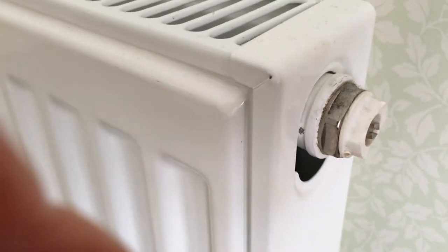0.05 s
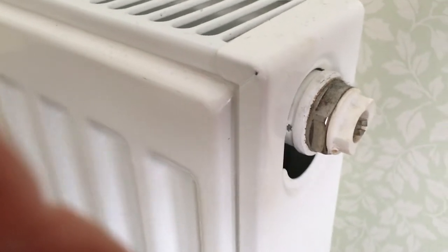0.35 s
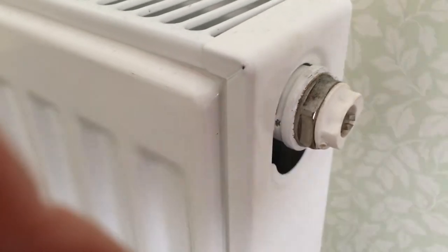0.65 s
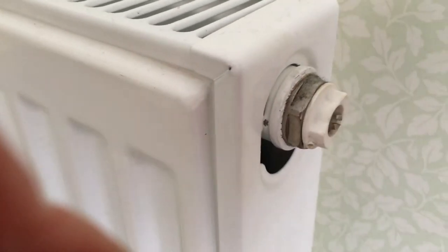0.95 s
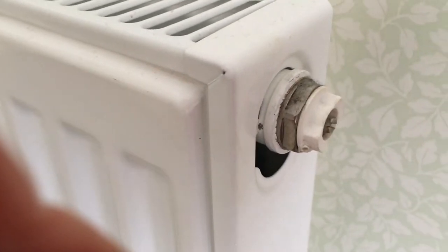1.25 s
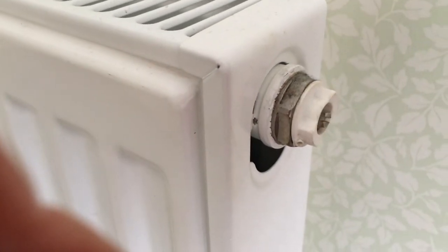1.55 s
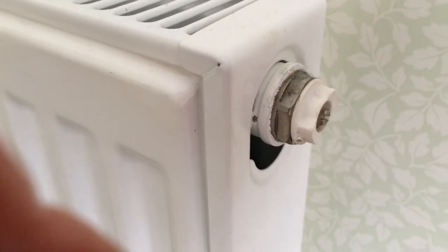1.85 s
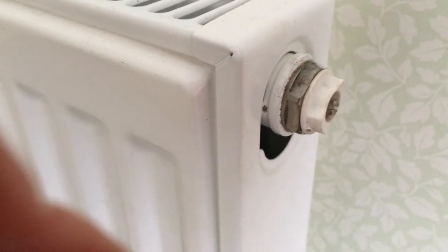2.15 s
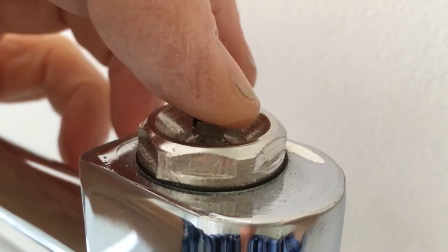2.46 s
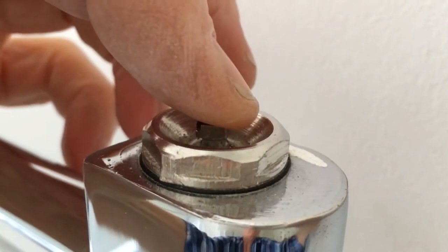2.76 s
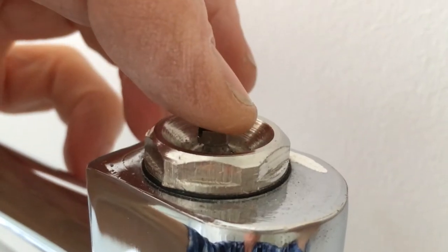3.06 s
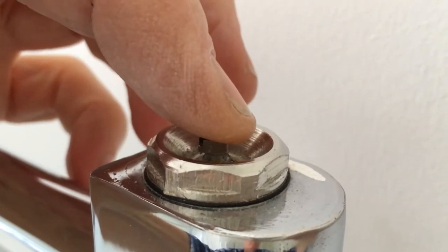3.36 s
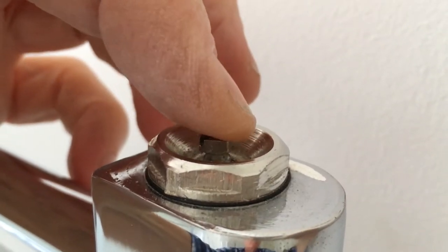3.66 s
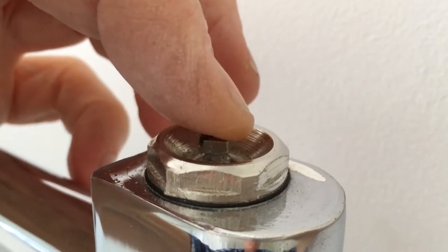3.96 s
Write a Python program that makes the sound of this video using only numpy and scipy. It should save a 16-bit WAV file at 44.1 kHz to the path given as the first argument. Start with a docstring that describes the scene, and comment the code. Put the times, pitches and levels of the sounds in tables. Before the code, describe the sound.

A close, steady hiss of air escapes a radiator valve indoors. Soft handling knocks come about halfway, then a second valve spits and hisses more brightly, giving faint metallic pings as fingers open it and ease it back.

```python
"""Air hisses from the bleed valves of two radiators in turn, close to a hand-held camera in a quiet room.
Each hiss is turbulent noise shaped by the valve's resonances: the first is steady, and at 2.2 s a short
spit leads to the second, thinner and brighter. Fingers turn that valve, and its metal modes ping as it
opens and as it is eased back. The hand bumps and clicks on the camera and rustles as it grips the valve;
beneath lies low room tone, with one brief hum."""
import sys
import numpy as np
from scipy import signal
from scipy.fft import rfft, irfft, next_fast_len
from scipy.io import wavfile
from scipy.ndimage import uniform_filter1d, map_coordinates

SR = 44100
rng = np.random.default_rng(int(sys.argv[2]) if len(sys.argv) > 2 else 0)


def log_audio(samples):
    """Write samples as a 16-bit WAV file to the path given in sys.argv[1]."""
    # one column per channel
    frames = np.atleast_2d(samples).T
    # limit to full scale, then quantise
    limited = np.clip(frames, -1, 1)
    pcm = np.round(limited * 32767).astype(np.int16)
    wavfile.write(sys.argv[1], SR, pcm)


N = 176400

# Relative spectra of the air jets: frequency_hz, density_db
FIRST_JET = [(100, -80), (400, -41), (820, -24.5), (950, -19.0), (1420, -18), (1640, -11), (1770, -12.5),
             (2110, -5), (2580, -9), (2710, -13.5), (3100, -11.5), (3570, -17.0), (3700, -11), (4010, -8),
             (4090, -8.5), (4740, 0), (4870, -3.5), (5170, 0), (5470, -1.5), (5810, -7), (6500, -8.5),
             (7020, -2.5), (7450, -6.5), (7880, -5.5), (8700, -6.5), (9040, -10), (9520, -6.5),
             (10030, -7.5), (10470, -18), (10770, -7), (11110, -17), (11240, -10), (11580, -6),
             (11670, -6.5), (12360, 0.5), (12920, -3.0), (13390, -14), (13610, -9), (13780, -8.5),
             (14170, -4), (14940, -9.5), (15120, -15.5)]
SPIT_JET = [(880, -56), (1500, -25), (3270, -22.5), (4810, -24), (5350, -12), (8410, 2), (12100, -11),
            (15000, -3.5)]
OPEN_JET = [(187, -82), (750, -43), (1510, -28), (2020, -22.5), (2370, -18), (2670, -19), (3140, -11.5),
            (3490, -15), (3620, -20), (3790, -21.5), (3880, -20), (4050, -13), (4350, -12), (4440, -15.5),
            (4610, -13.5), (4780, -14.5), (5080, -11.0), (5810, -5), (6070, -8.5), (7240, -10.5),
            (7360, -7), (7490, -9.5), (8660, 1), (9130, 0.0), (9430, -8), (9780, -2), (10290, -3.5),
            (10420, -7.5), (11370, -4.5), (11710, -7.5), (12060, -13), (12320, -13), (12920, -2),
            (13350, -10.0), (13910, -2), (14380, 0), (14940, -5.5), (15120, -13.5)]
THROTTLED_JET = [(237, -80), (950, -42), (1950, -20.5), (2530, -18), (3220, -12), (3790, -20.5),
                 (4250, -10.5), (4590, -14.5), (5860, -6), (6200, -13), (7460, -9.5), (8730, 1.5),
                 (9070, 2), (9420, -10), (9760, -2), (10450, -7), (11480, -4.5), (12060, -9.0), (12980, -2),
                 (13440, -5), (13780, 1), (15040, -5.5)]
# Relative spectra of the room tone at each radiator: frequency_hz, density_db
FIRST_ROOM = [(15, -32), (25, -2.5), (49, 0.5), (160, -10), (204, -8.5), (325, -11), (413, -16),
              (472, -13.5), (900, -21), (1170, -28), (1980, -120)]
SECOND_ROOM = [(15, -67), (25, -26), (50, -7), (86, 1), (125, -11.5), (167, -4), (329, -16), (400, -15.5),
               (496, -20.5), (1800, -27), (2340, -60), (3960, -120)]
# Partials of the hum: pitch_hz, width_hz, relative_db
HUM_PARTIALS = [(138.2, 16, -0.5), (224, 9.5, 2), (294, 60, -10)]
# Soft impacts of the hand on the camera: start_s, level_db
HAND_BUMPS = [(1.429, -49), (1.485, -43), (1.941, -40), (2.012, -48), (2.052, -39), (2.12, -39)]
# Sharp impacts on the camera: start_s, level_db, cutoff_hz
HAND_CLICKS = [(1.9353, -37, 1400), (2.047, -54, 1500), (2.214, -51, 300), (2.233, -48.5, 400)]
# Modes of the camera's case: pitch_hz, relative_db, t60_s
CASE_MODES = [(129, -8, 0.045), (520, 1, 0.017), (1120, -5, 0.018)]
# Envelope of the second valve's open jet: time_s, level_db
OPEN_FLOW = [(2.2, -44), (2.216, -42.5), (2.228, -47), (2.255, -45), (2.285, -42.5), (2.9, -43),
             (3.67, -44)]
# Excitations of the valve as it turns: start_s, level_db
VALVE_PINGS = [(2.214, -63), (2.236, -54.5), (3.677, -55.5)]
# Modes of the valve's metal: pitch_hz, relative_db, t60_s
VALVE_MODES = [(2089, -1, 0.22), (1610, -20, 0.37)]
# Relative spectrum of the fingers' rustle: frequency_hz, density_db
GRIP_SPECTRUM = [(50, -25), (170, -3), (350, -12), (900, -16), (2500, -23)]

CHANGE_S, CHANGE_FADE_S = 2.192, 0.012  # from the first radiator to the second
OPEN_S, OPEN_ATTACK_S = 2.1905, 0.007  # air starts through the second valve


def amp(db):
    """Amplitude ratio of a level in decibels."""
    return 10 ** (np.asarray(db) / 20)


def unit(x):
    """Normalisation to an rms of 1."""
    return x / np.sqrt(np.mean(x ** 2) + 1e-20)


def clock():
    """Time of each sample in seconds."""
    return np.arange(N) / SR


def ramp(start_s, length_s):
    """Linear rise from 0 to 1."""
    return np.clip((clock() - start_s) / length_s, 0, 1)


def swell(start_s, attack_s, hold_s, release_s):
    """Trapezoidal amplitude envelope."""
    return ramp(start_s, attack_s) * (1 - ramp(start_s + attack_s + hold_s, release_s))


def wobble(rate_hz):
    """Random modulation: a spline through Gaussian values drawn at rate_hz."""
    return map_coordinates(rng.standard_normal(int(N * rate_hz / SR) + 4), [clock() * rate_hz])


def filtered(x, response):
    """Linear filtering: the spectrum is multiplied by a frequency response."""
    size = next_fast_len(N + SR // 2)
    return irfft(rfft(x, size) * response(np.fft.rfftfreq(size, 1 / SR)), size)[..., :N]


def coloured(x, spectrum):
    """Spectral shaping on a logarithmic frequency axis, normalised to an rms of 1."""
    points_hz, db = np.transpose(spectrum)
    return unit(filtered(x, lambda hz: amp(np.interp(np.log(hz + 1), np.log(points_hz + 1), db))))


def damped_mode(start_s, hz, t60_s, attack_s):
    """Free vibration: a sinusoid that builds up, then decays by 60 dB in t60_s."""
    t = np.maximum(clock() - start_s, 0)
    return np.sin(2 * np.pi * hz * t) * np.exp(-np.log(1000) * t / t60_s) * (1 - np.exp(-t / attack_s))


def jet(spectrum, patchy_db, flutter_db, sizzle_db):
    """Turbulence gives noise of fluctuating colour and level, filtered by the valve's resonances."""
    cells = signal.stft(rng.standard_normal(N), nperseg=256)[2]
    patches = uniform_filter1d(rng.standard_normal(cells.shape), size=9, axis=0)  # across frequency
    patches = uniform_filter1d(patches, size=18, axis=1)  # across time
    air = signal.istft(cells * amp(patchy_db * unit(patches)), nperseg=256)[1][:N]
    modulation_db = flutter_db * wobble(rate_hz=40) + sizzle_db * wobble(rate_hz=1500)
    return coloured(air * amp(modulation_db), spectrum)


def first_valve(treble_hz=8300, sag_db_per_s=0.6):
    """A steady turbulent jet gives a full hiss, whose treble slowly sinks."""
    air = jet(FIRST_JET, patchy_db=0.5, flutter_db=0.23, sizzle_db=0.83)
    treble = filtered(air, lambda hz: 1 - 1 / (1 + (hz / treble_hz) ** 10))
    sag = amp(-sag_db_per_s * (clock() - CHANGE_S / 2))
    return amp(-42) * (air - treble + sag * treble) * (1 - ramp(CHANGE_S, CHANGE_FADE_S))


def room_tone():
    """Low-frequency ambient noise has its own spectrum at each radiator."""
    first = amp(-64 + 2.1 * wobble(rate_hz=7.67)) * coloured(rng.standard_normal(N), FIRST_ROOM)
    second = amp(-60.5) * coloured(rng.standard_normal(N), SECOND_ROOM)
    change = ramp(CHANGE_S, CHANGE_FADE_S)
    return (1 - change) * first + change * second


def hum():
    """Low partials under random frequency modulation swell and fade with a soft rubbing noise."""
    tone = 0
    for hz, width_hz, db in HUM_PARTIALS:
        pitch_hz = hz + width_hz / 2 * wobble(rate_hz=30.26)
        tone += amp(db) * np.sin(2 * np.pi * np.cumsum(pitch_hz) / SR)
    rub = coloured(rng.standard_normal(N), FIRST_ROOM)
    envelope = swell(start_s=0.587, attack_s=0.095, hold_s=0.16, release_s=0.2)
    return (amp(-61) * unit(tone) + amp(-58.5) * rub) * envelope


def camera_bumps():
    """Each soft impact of the hand excites one low damped mode."""
    return sum(amp(db) * damped_mode(start_s, hz=55.6, t60_s=0.22, attack_s=0.0063)
               for start_s, db in HAND_BUMPS)


def camera_clicks(burst_t60_s=0.014):
    """Each short impact is a low-passed noise burst and excites the case's modes, mainly below cutoff."""
    out = np.zeros(N)
    t = np.arange(SR // 20) / SR
    for start_s, db, cutoff_hz in HAND_CLICKS:
        burst = rng.standard_normal(len(t)) * np.exp(-np.log(1000) * t / burst_t60_s)
        click = signal.sosfilt(signal.butter(6, cutoff_hz, fs=SR, output="sos"), burst)
        out[round(start_s * SR):][:len(t)] += amp(db) * click / np.abs(click).max()
        for hz, mode_db, t60_s in CASE_MODES:
            excitation = amp(db + mode_db) / (1 + (hz / cutoff_hz) ** 10)
            out += excitation * damped_mode(start_s, hz, t60_s, attack_s=0.0003)
    return out


def spit():
    """A transient of strongly modulated turbulence escapes as the second valve opens."""
    air = jet(SPIT_JET, patchy_db=0.5, flutter_db=2.2, sizzle_db=3.0)
    return amp(-31.5) * air * swell(OPEN_S, OPEN_ATTACK_S, hold_s=0.008, release_s=0.007)


def second_valve():
    """A brighter turbulent jet, which thins when easing the valve back throttles the flow."""
    flow = amp(np.interp(clock(), *np.transpose(OPEN_FLOW))) * ramp(OPEN_S, OPEN_ATTACK_S)
    wide = flow * jet(OPEN_JET, patchy_db=0.35, flutter_db=0.34, sizzle_db=-0.05)
    eased = amp(-46.5) * jet(THROTTLED_JET, patchy_db=0.9, flutter_db=0.2, sizzle_db=0.5)
    turn = ramp(start_s=3.668, length_s=0.012)
    return np.sqrt(1 - turn) * wide + np.sqrt(turn) * eased  # independent noises add in power


def valve_pings():
    """Each turn sets the valve's metal into faint free vibration in two modes."""
    return sum(amp(db + mode_db) * damped_mode(start_s, hz, t60_s, attack_s=0.0014)
               for start_s, db in VALVE_PINGS for hz, mode_db, t60_s in VALVE_MODES)


def grip_rustle():
    """Friction of the fingers on the second valve gives a brief, dull noise."""
    rustle = amp(-59.5) * coloured(rng.standard_normal(N), GRIP_SPECTRUM)
    return rustle * swell(start_s=2.4, attack_s=0.023, hold_s=0.045, release_s=0.092)


def scene():
    """The sources add by superposition and reach both channels alike."""
    mono = first_valve() + room_tone() + hum() + camera_bumps() + camera_clicks()
    mono += spit() + second_valve() + valve_pings() + grip_rustle()
    return np.array([mono, mono])


def record(dry):
    """The camera's band limit acts as an ideal low-pass filter."""
    return filtered(dry, lambda hz: hz < 15170)


dry = scene()
out = record(dry)
log_audio(out)
```